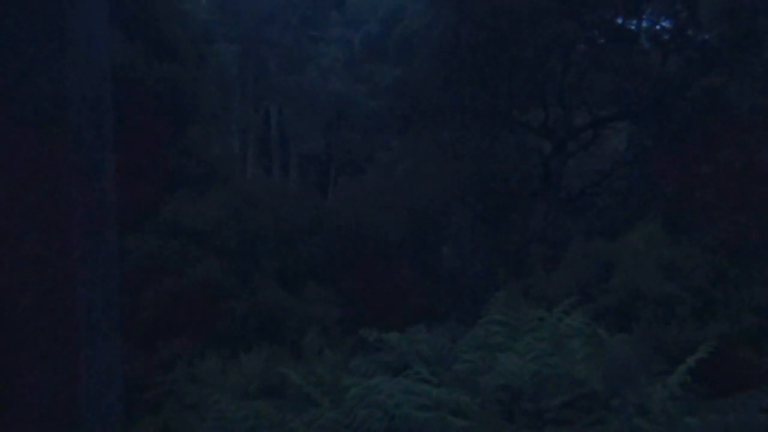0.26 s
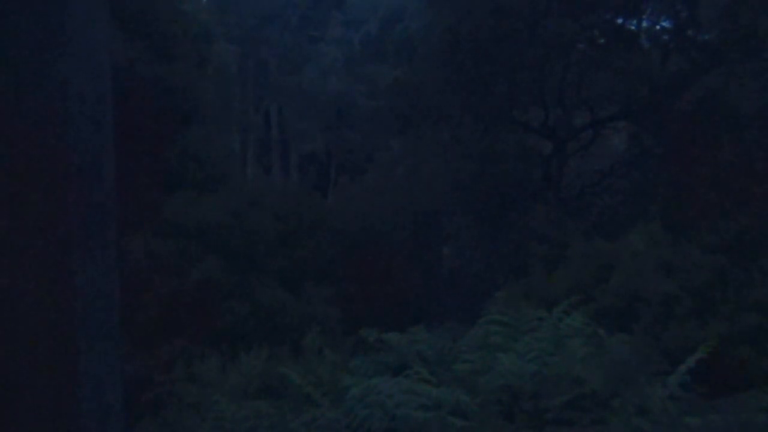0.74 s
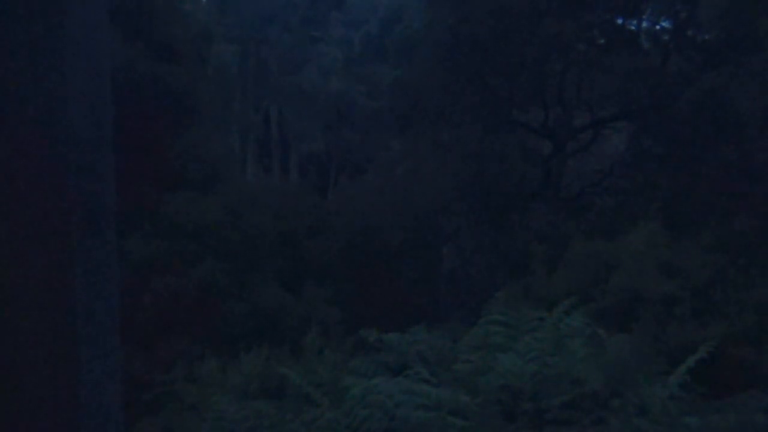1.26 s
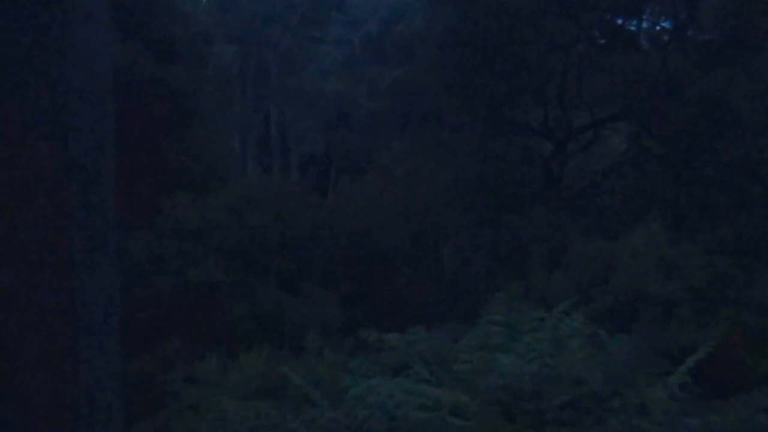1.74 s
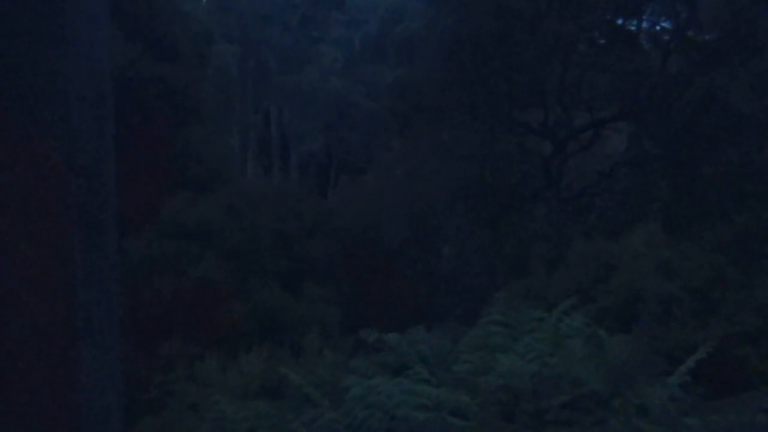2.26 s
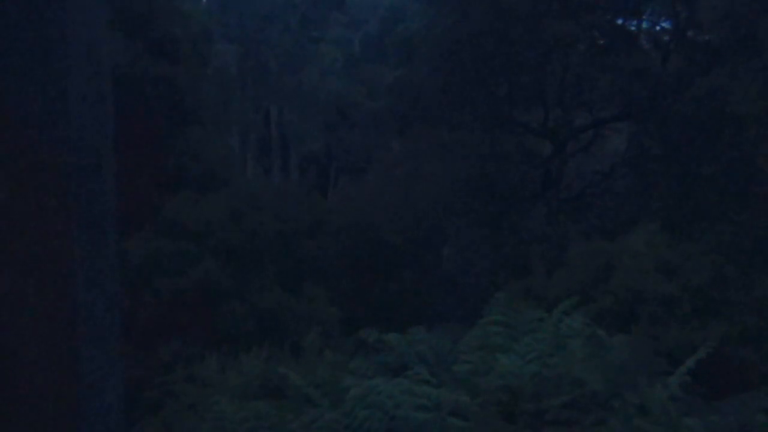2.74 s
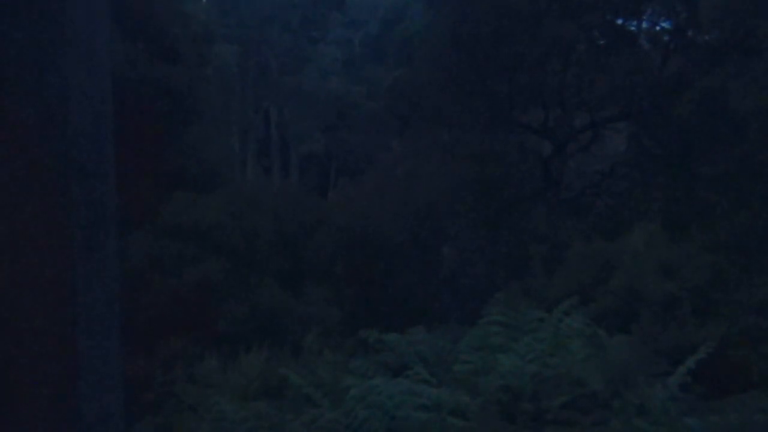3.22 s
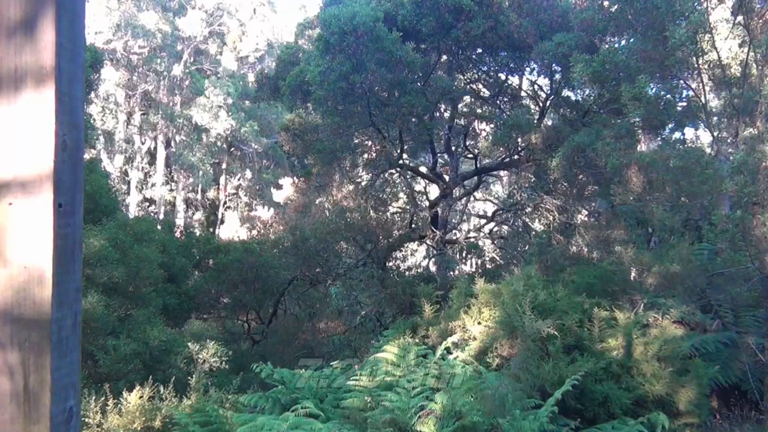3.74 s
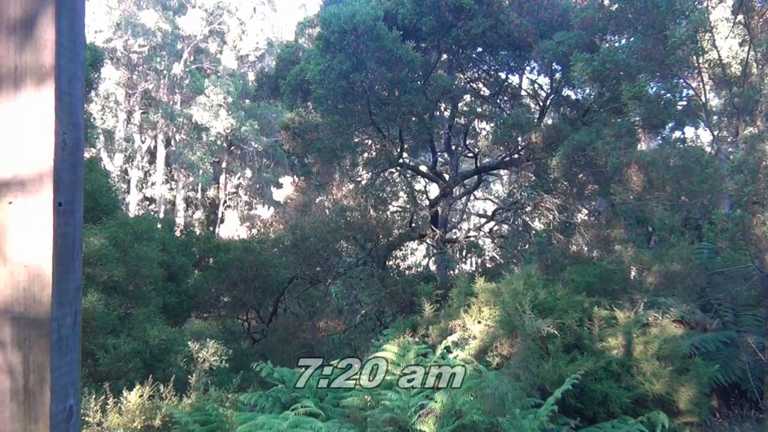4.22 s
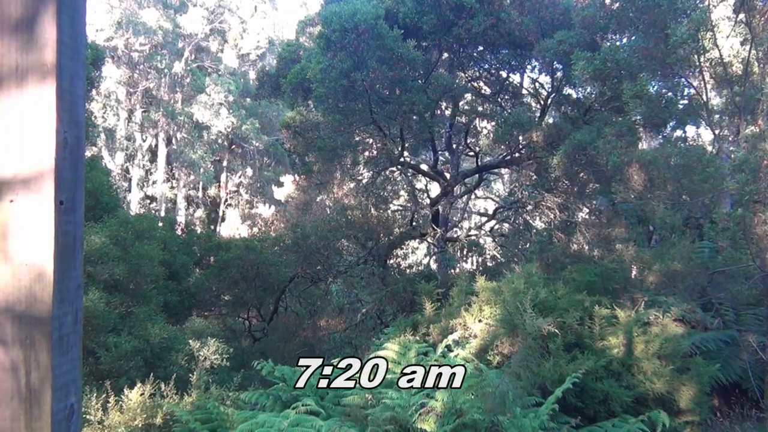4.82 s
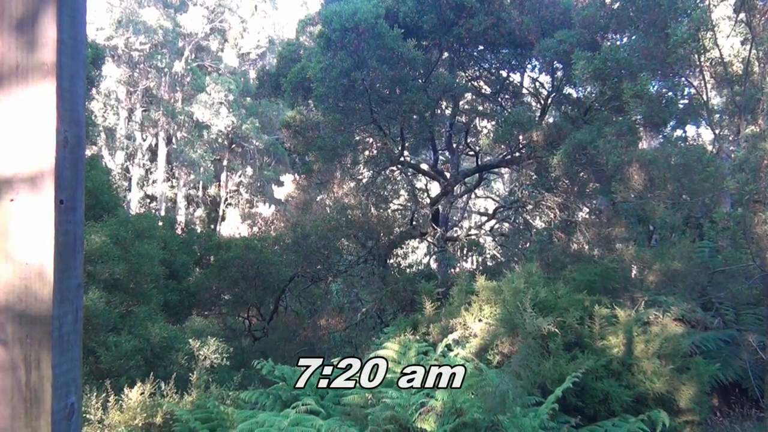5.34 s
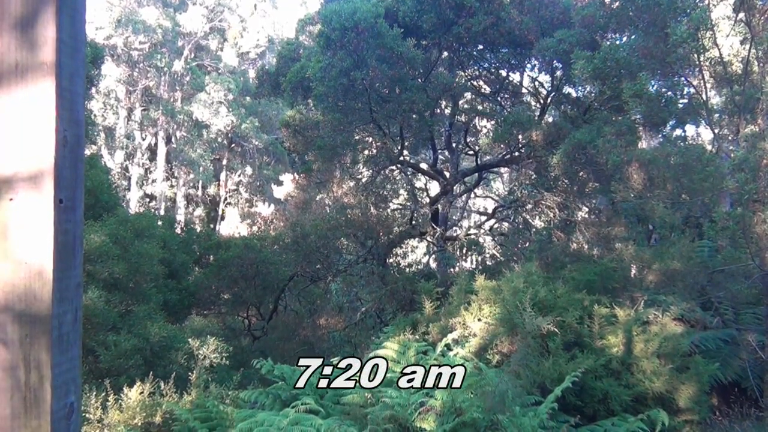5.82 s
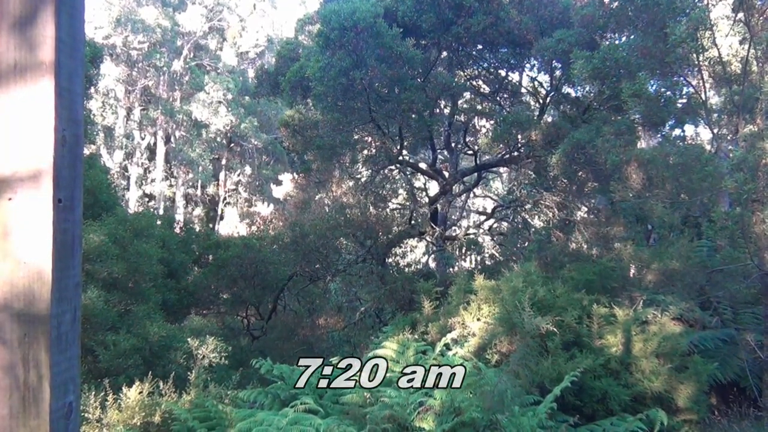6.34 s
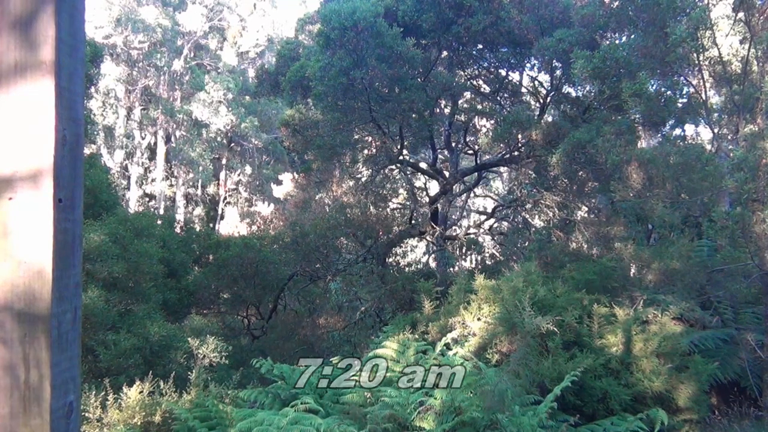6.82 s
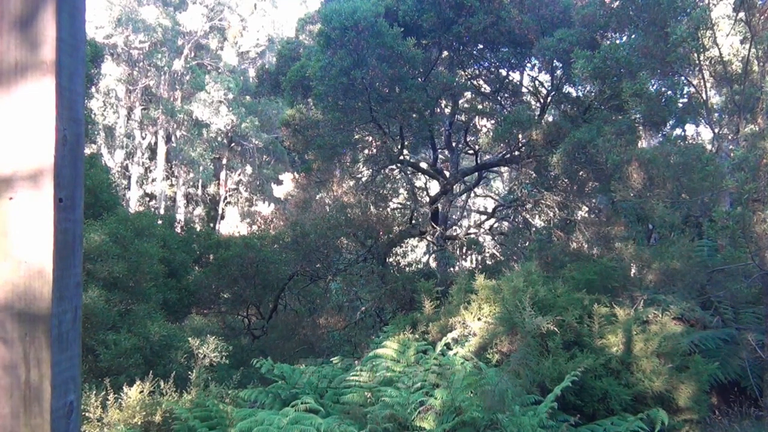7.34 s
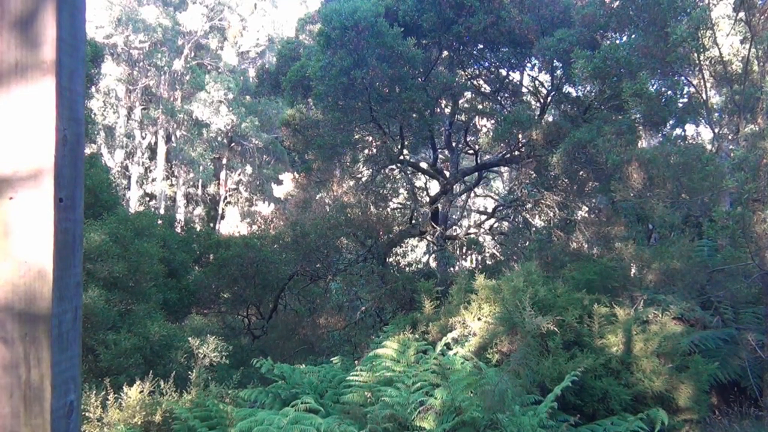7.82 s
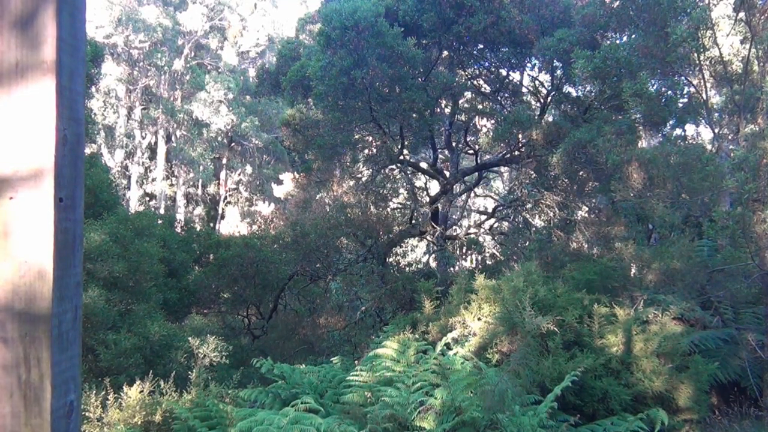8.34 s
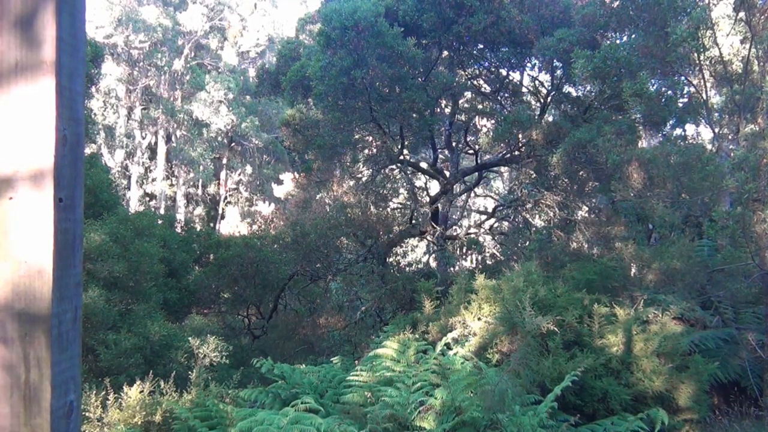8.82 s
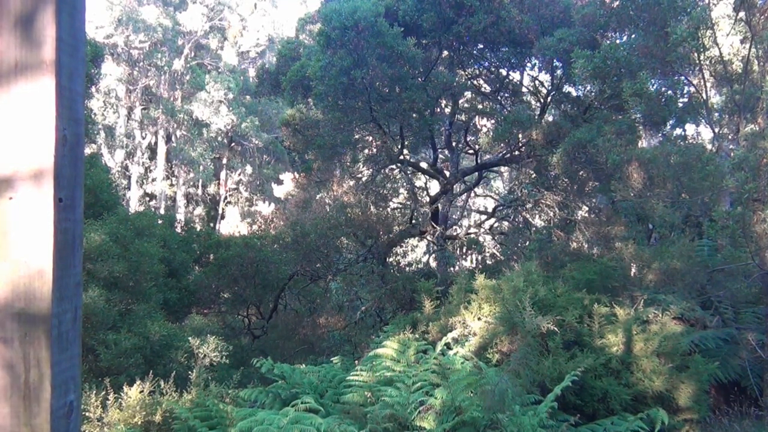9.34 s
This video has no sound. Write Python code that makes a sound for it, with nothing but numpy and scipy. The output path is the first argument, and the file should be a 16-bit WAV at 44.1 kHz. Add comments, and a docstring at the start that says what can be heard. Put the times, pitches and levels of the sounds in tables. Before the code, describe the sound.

Crowded chirping forest birds fade out after a few seconds; a quieter morning fades in with river wash, piping, whip-like calls and handling knocks.

```python
"""Forest around a distant river, heard by a small stereo camera microphone. Before dawn a dense chorus of bent
pure tones and insects of throbbing filtered noise play over a faint harmonic hum, then fade to silence. The morning
fades in over river noise: gliding whistles and whips, piped notes, harsh calls of resonated throat pulses and far
wavering calls. Knocks of scraping and thudding noise fall near the microphone throughout. Trunks and leaves
return every bird note as a diffuse echo."""
import sys
import numpy as np
from scipy import signal
from scipy.fft import rfft, irfft
from scipy.io import wavfile
from scipy.ndimage import uniform_filter1d

SR = 44100
rng = np.random.default_rng(int(sys.argv[2]) if len(sys.argv) > 2 else 0)


def master_out(mix):
    """Clip the mix to full scale and print it as 16-bit PCM to the path in sys.argv[1]."""
    frames = np.transpose(np.atleast_2d(mix))
    ceiling = np.clip(frames, -1, 1)
    pcm = np.round(ceiling * 32767).astype(np.int16)
    wavfile.write(sys.argv[1], SR, pcm)


N = 422037
TIME = np.arange(N) / SR
DAWN_FADE_S, SILENCE_S, MORNING_FULL_S = 2.37, 3.54, 4.43


def undb(db):
    """Decibels to gain."""
    return 10 ** (np.asarray(db) / 20)


def level(x, db):
    """Set the rms level."""
    return x * undb(db) / np.sqrt(np.mean(x ** 2))


def walk(rate, size=N):
    """Smooth random wander with spread near 1, from random steps at a rate in Hz."""
    k = max(int(SR / rate), 1)
    steps = np.repeat(rng.standard_normal(size // k + 1), k)
    return 1.3 * uniform_filter1d(uniform_filter1d(steps, k), k)[:size]


def band(x, hz, width_hz):
    """Two-pole resonance, gain 1 at the centre."""
    return signal.lfilter(*signal.iirpeak(hz, hz / width_hz, SR), x)


def add(out, sound, start, pan_db=0):
    """Place a sound between the channels; a positive pan leans left."""
    i = int(start * SR)
    out[:, i:i + len(sound)] += undb([[pan_db / 2], [-pan_db / 2]]) * sound[:N - i]


def glide(from_hz, to_hz, bend=0.502):
    """Three pitches of a glide; bend is the share of the interval covered at half length."""
    return from_hz, from_hz * (to_hz / from_hz) ** bend, to_hz


def whistle(length, pitch_hz, db, flutter_db=.8, waver_hz=0, edge=.2, top_db=-5):
    """A pure tone bent through three pitches, weaker above its middle pitch (dB per octave); leaves make it flutter."""
    u = np.linspace(0, 1, int(length * SR))
    first, mid, last = np.log(pitch_hz)
    slope, bow = last - first, first + last - 2 * mid
    hz = np.exp(mid + slope * (u - .5) + 2 * bow * (u - .5) ** 2) + waver_hz * walk(122.5, len(u))
    swell = np.sin(np.pi / 2 * np.clip(np.minimum(u, 1 - u) / edge, 0, 1))
    db = db + top_db * np.maximum(np.log2(hz / pitch_hz[1]), 0) + flutter_db * walk(40, len(u))
    return undb(db) * swell * np.sin(2 * np.pi * np.cumsum(hz) / SR)


def forest(dry, echo_db, t60_s, gap_s=0.007, side_db=-11):
    """Dense scattered echoes from trunks; the treble dies sooner."""
    t = np.arange(int(1.2 * SR)) / SR
    decay = np.exp(-np.log(1000) * t / t60_s) * (1 - np.exp(-t / gap_s))
    scatter = rng.standard_normal((2, len(t))) * decay
    late = signal.lfilter(*signal.butter(1, 3500, fs=SR), scatter)
    mid, side = late + (scatter - late) * np.exp(-t / .2)
    echoes = np.array([mid + undb(side_db) * side, mid - undb(side_db) * side])
    echoes = echoes * undb(echo_db) / np.sqrt(np.sum(mid ** 2))
    return dry + signal.fftconvolve(dry, echoes, axes=1)[:, :N]


# Stereo spread of the noise beds: (frequency [Hz], side over mid [dB])
BED_WIDTH = [(40, -10), (160, -22.5), (300, -18.5), (650, -9.5), (2000, -8), (7000, -5.5), (13000, -13)]


def bed(spectrum, db, flicker_db):
    """Stereo noise with a given spectrum; octave-wide parts flicker on their own."""
    hz = np.maximum(np.fft.rfftfreq(N, 1 / SR), 1)
    shape, width = (undb(np.interp(np.log(hz), np.log(f), gain))
                    for f, gain in (np.transpose(spectrum), np.transpose(BED_WIDTH)))
    mid, side = rfft(rng.standard_normal((2, N))) * shape
    pair = np.array([mid + width * side, mid - width * side])
    octaves = np.clip(np.log2(hz / 62.5), 0, 8)
    total = 0
    for k in range(9):
        part = irfft(pair * np.clip(1 - abs(octaves - k), 0, 1), N)
        total = total + part * undb(flicker_db * walk(6.8))
    return level(total, db)


# Tone colour of the blurred far chorus and air: (frequency [Hz], relative density [dB])
DAWN_SPECTRUM = [(59, -102), (100, -42), (200, -24.5), (278, -22), (1010, -13.5), (1480, -14.5),
                 (1980, -3.5), (3970, -8.5), (5000, -5.5), (5700, -11.5), (6600, -10.5), (7400, -15.5),
                 (8250, -25), (9080, -55), (10000, -50), (13000, -91), (22000, -120)]


def dawn_air():
    """Far chorus and air blurred into shaped, flickering noise."""
    return bed(DAWN_SPECTRUM, -37, 1.8)


# Tone colour of the river: (frequency [Hz], relative density [dB])
RIVER_SPECTRUM = [(18, -59), (30, -25), (111, -12.5), (193, 0.5), (549, -3), (1000, 2), (1240, -6.5),
                  (1410, -4.5), (2640, -7.5), (3810, -10.5), (6110, -17.5), (7730, -19), (15700, -23.5)]
# Slow level ride of the river: (time [s], gain [dB])
RIVER_RIDE = [(4.5, -0.5), (9.57, -3)]


def river():
    """A distant river as shaped noise whose level is ridden slowly."""
    return bed(RIVER_SPECTRUM, -45.5, 1.0) * undb(np.interp(TIME, *np.transpose(RIVER_RIDE)))


HUM_HZ, HUM_DB = 46.9, -66  # fundamental, level of each harmonic


def hum():
    """A faint steady hum under the dawn chorus, sounding only harmonics 6 to 8."""
    return undb(HUM_DB) * sum(np.sin(2 * np.pi * (k * HUM_HZ * TIME + rng.random())) for k in range(6, 9))


INSECT_HZ, INSECT_WIDTH_HZ, THROB_HZ, INSECT_DB = 13570, 2800, 15.86, -43.5


def insects():
    """Many insects stridulating in step: high hiss that throbs."""
    throb_db = 2.6 * np.cos(2 * np.pi * (THROB_HZ * TIME + .02 + .05 * walk(5)))
    mid, side = (band(band(rng.standard_normal(N), INSECT_HZ, INSECT_WIDTH_HZ), INSECT_HZ, INSECT_WIDTH_HZ)
                 for _ in range(2))
    hiss = mid + undb(-17.0) * side * np.array([[1], [-1]])
    return level(hiss * undb(throb_db + 0.61 * walk(20)), INSECT_DB)


def crowd(count=750, loudest_db=-33.5):
    """Further birds before dawn, at random: mostly quick falling chips, some rising, hooked or arched."""
    out = np.zeros((2, N))
    for when, low, fall, bow, long, loud, side in rng.random((count, 7)):
        end_hz = 1900 + 2400 * low ** .7
        drop = .36 * fall - .1  # a negative drop makes the note rise
        pitch = end_hz * np.array([1 + drop, 1 + .25 * drop + .16 * (bow - .5), 1])
        note = whistle(.014 + 0.035 * long, pitch, loudest_db - 10 * loud, 2.5)
        add(out, note, when * SILENCE_S, 6 * (side - .4))
    return out


# Knocks near the microphone: (start [s], scrape level [dB], thud over scrape [dB], decay time [s])
KNOCK_HITS = [(0.103, -51, 8, 0.032), (0.626, -41.5, -3, 0.043), (0.99, -39, -1.5, 0.037),
              (1.562, -51.5, 11.5, 0.049), (2.418, -52, 8, 0.036), (3.276, -28.5, -7, 0.029),
              (3.35, -30.5, -4, 0.026), (4.01, -36.5, 4, 0.0081), (4.571, -29, -4, 0.034),
              (4.848, -39, 9.5, 0.019), (6.858, -38.5, -10, 0.13), (9.175, -27.5, -9, 0.02),
              (9.189, -22, -21, 0.0026), (9.199, -21, -23, 0.0026), (9.202, -32.5, 2, 0.024)]


def knocks():
    """A bright scrape and a dull thud of the housing, both resonated noise, dying together."""
    out = np.zeros((2, N))
    for start, db, thud_db, length in KNOCK_HITS:
        t = np.arange(int(4 * length * SR)) / SR
        scrape, thud = rng.standard_normal((2, len(t)))
        scrape = level(band(scrape, 1800, 2200), db)
        thud = level(band(band(thud, 340, 620), 340, 620), db + thud_db)
        envelope = np.exp(-t / length) * (1 - np.exp(-t / (0.83 * length)))
        add(out, (scrape + thud) * envelope, start)
    return out


# Far wavering calls: (start [s], length [s], start pitch [Hz], end pitch [Hz], level [dB], waver [Hz])
FAR_CALLS = [(0.187, 0.11, 6560, 6400, -43.5, 140), (0.412, 0.1, 6920, 7000, -50, 55),
             (.57, 0.074, 6200, 6450, -48, 69), (1.436, 0.038, 7060, 7020, -31.5, 195),
             (3.556, 0.082, 1031, 1033, -40.5, 9.1), (3.576, 0.19, 2845, 2740, -44.5, 184),
             (3.718, 0.048, 2886, 3230, -41, 68), (3.756, 0.15, 1057, 1027, -48, 10.7),
             (3.82, 0.16, 1153, 1143, -43, 8.3), (4.001, 0.85, 1130, 1113, -52, 14.2),
             (4.422, 0.11, 1076, 1028, -42, 5.6), (4.423, 0.39, 1398, 1385, -54, 10),
             (4.516, 0.31, 1030, 1017, -44.5, 26.5), (4.676, 0.46, 1123, 1120, -47.5, 4.2),
             (5.151, 0.39, 1101, 1028, -40.5, 1.9), (5.555, 0.24, 990, 834, -50, 59),
             (6.2, 0.051, 1500, 1446, -52.5, 9.9), (6.301, 0.016, 986, 1050, -46, 32),
             (6.678, 0.23, 903, 927, -51.5, 59), (7.066, 0.036, 7400, 7130, -50, 130),
             (8.376, 0.16, 1827, 1880, -53, 47), (8.68, .09, 5600, 5400, -61, 90),
             (8.898, 0.063, 1836, 1800, -51, 41), (9.332, 0.09, 3320, 3760, -55, 154)]


def far_calls(out):
    """Far tones with unsteady pitch; the more they waver, the more they flutter, up to a limit."""
    for start, length, from_hz, to_hz, db, waver_hz in FAR_CALLS:
        flutter_db = min(1 + waver_hz / 10, 3.8)
        add(out, whistle(length, glide(from_hz, to_hz), db, flutter_db, waver_hz), start, 2.5)


# Thin double ticks of one small bird: (start [s], level [dB])
TICK_PAIRS = [(0.635, -39.5), (.808, -44), (.971, -39), (1.132, -42.5), (2.108, -41)]


def ticks(out):
    """Two tiny rising tones in quick succession, the second lower."""
    for start, db in TICK_PAIRS:
        add(out, whistle(0.019, (7200, 7900, 8600), db), start)
        add(out, whistle(0.012, (6000, 6900, 7400), db + 1.0), start + 0.012)


# Scooped calls: (start [s], level [dB])
SCOOP_CALLS = [(3.795, -48.5), (6.664, -49.5), (8.499, -54)]


def scoops(out, lead_s=.065, flip_s=.035, pan_db=5):
    """A slow lead-in that flips upward."""
    for start, db in SCOOP_CALLS:
        add(out, whistle(lead_s, glide(4980, 5350), db), start, pan_db)
        add(out, whistle(flip_s, glide(5350, 6250), db), start + .9 * lead_s, pan_db)


# Steep low drops of one bird to the right: (start [s], start pitch [Hz], end pitch [Hz], level [dB])
LOW_DROPS = [(.995, 3270, 1614, -29.5), (1.133, 2900, 1686, -27), (1.288, 2940, 1970, -27),
             (2.292, 3090, 1867, -30), (2.468, 2890, 1880, -28.5)]


def drops(out):
    """Short tones that plunge, faster in the second half."""
    for start, from_hz, to_hz, db in LOW_DROPS:
        add(out, whistle(.036, glide(from_hz, to_hz, .42), db), start, -3.5)


# Short squeaks of the harsh callers: (start [s], length [s], start pitch [Hz], end pitch [Hz], level [dB])
SQUEAK_NOTES = [(8.21, .024, 4400, 4300, -50), (8.226, .018, 4400, 3900, -49),
                (8.234, .022, 3400, 2750, -41), (8.918, .014, 4400, 4050, -53),
                (8.938, .045, 3150, 2750, -44), (9.245, .035, 3450, 2950, -50),
                (9.495, .045, 3200, 2450, -47)]


def squeaks(out):
    """Brief falling tones with unsteady pitch."""
    for start, length, from_hz, to_hz, db in SQUEAK_NOTES:
        add(out, whistle(length, glide(from_hz, to_hz, .65), db, 2.5, 90), start, 1.5)


# Harsh calls: (start [s], length [s], start pulse rate [Hz], end pulse rate [Hz], level [dB],
# roughness [0 = clear], brightness [dB per octave])
HARSH_NOTES = [(4.292, 0.11, 530, 560, -48.5, 0.3, -4), (4.99, 0.12, 455, 562, -45, 0.3, 1),
               (8.245, 0.1, 800, 640, -44.5, 0.95, 4), (8.501, 0.085, 580, 545, -45, 0.7, -7),
               (8.951, 0.11, 820, 660, -39.5, 0.95, 1), (9.422, 0.1, 548, 545, -45, 0.5, -6)]
# Throat resonances, each passed twice: (centre [Hz], width of one pass [Hz], gain before brightness [dB])
THROAT_RESONANCES = [(1500, 800, 0), (2150, 750, -6), (2900, 1100, -5), (4400, 1500, -16),
                     (5600, 1500, -25)]


def harsh_calls():
    """Throat pulses through fixed resonances; the pulse rate glides and the end breaks into noise."""
    out = np.zeros((2, N))
    for start, length, from_hz, to_hz, db, rough, bright_db in HARSH_NOTES:
        u = np.linspace(0, 1, int(length * SR))
        hz = to_hz + (from_hz - to_hz) * (1 - u) ** 1.3
        hoarse = rough * (.65 + 1.8 * u ** 3)
        cycles = np.cumsum(hz * (1 + .11 * hoarse * walk(250, len(u)))) / SR
        beats = np.diff(np.floor(cycles), prepend=0)  # one click per throat cycle
        pulses = level(beats, 0) + hoarse * rng.standard_normal(len(u))
        voice = 0
        for f, width, gain_db in THROAT_RESONANCES:
            tilt_db = bright_db * np.log2(f / THROAT_RESONANCES[0][0])
            voice = voice + undb(gain_db + tilt_db) * band(band(pulses, f, width), f, width)
        envelope = signal.windows.tukey(len(u), .3) * undb(1.3 * walk(108.5, len(u)))
        add(out, level(voice, db) * envelope, start, 1.5)
    squeaks(out)
    return out


# Long swelling piped notes, one curve each: (time [s], pitch [Hz], level [dB])
PIPED_CURVES = [
    [(4.38, 2727, -36), (4.43, 2876, -53), (4.59, 2767, -32.5), (4.66, 2718, -35.5), (4.68, 2780, -45.5),
     (4.914, 2773, -48), (4.95, 2670, -53)],
    [(6.12, 2630, -58), (6.128, 2704, -46.5), (6.212, 2797, -37.5), (6.316, 2788, -31.5),
     (6.428, 2665, -34), (6.44, 2680, -42), (6.45, 2810, -44)],
]


def pipers():
    """The long notes of one clear bird: a tone with a weak octave, drawn along pitch and level curves."""
    out = np.zeros((2, N))
    for curve in PIPED_CURVES:
        s, hz, db = np.transpose(curve)
        t = np.arange(s[0], s[-1], 1 / SR)
        phase = 2 * np.pi * np.cumsum(np.interp(t, s, hz)) / SR
        tone = np.sin(phase) + undb(-16) * np.sin(2 * phase)
        add(out, tone * undb(np.interp(t, s, db)) * signal.windows.tukey(len(t), .1), s[0], -1)
    return out


# Whips and arched calls: (start [s], length [s], start pitch [Hz], end pitch [Hz], level [dB],
# left minus right [dB], share of the glide done at half length [ratio])
WHIP_CALLS = [(1.428, 0.061, 1930, 1790, -26, 1.5, -0.6), (2.561, 0.054, 3096, 2800, -28.5, 1, 0.095),
              (2.636, 0.063, 3250, 2970, -28, 4.5, 0.12), (2.659, 0.11, 1884, 1520, -39, -2, .35),
              (1.985, 0.012, 6430, 9000, -31.5, 0, 0.43), (2.225, 0.023, 6730, 8550, -32, 0, 0.74),
              (3.919, 0.027, 1776, 2774, -40.5, 3, 0.86), (4.135, 0.032, 3190, 4140, -54, 7, 0.57),
              (4.254, 0.075, 2950, 4130, -41.5, 3.5, 0.75), (4.308, 0.053, 3950, 6470, -41, 4, 0.37),
              (4.511, 0.029, 1930, 4850, -41, 5, 0.58), (6.564, 0.053, 2200, 2810, -47, 5, 0.19),
              (6.693, 0.066, 3030, 4920, -37.5, 3.5, 0.88), (6.84, 0.1, 2400, 4190, -36.5, 3, 0.7),
              (7.156, 0.05, 1850, 2250, -46.5, 1, .05), (7.192, 0.087, 2000, 6850, -34.5, 3, 0.64)]


def whips(out):
    """Fast bent glides that flutter and lose level strongly above their middle pitch."""
    for start, length, from_hz, to_hz, db, pan_db, bend in WHIP_CALLS:
        add(out, whistle(length, glide(from_hz, to_hz, bend), db, 2.1, top_db=-21.5), start, pan_db)


# Held or evenly gliding whistles: (start [s], length [s], start pitch [Hz], end pitch [Hz], level [dB],
# left minus right [dB])
WHISTLE_NOTES = [(.101, 0.079, 6190, 6640, -38, -8), (.232, 0.18, 1666, 1681, -30.5, -1.5),
                 (.23, 0.025, 4140, 4380, -21.5, 0), (.333, 0.16, 3829, 3762, -21.5, 0),
                 (.442, 0.12, 1815, 1763, -29, 0), (.56, 0.072, 1786, 2070, -32.5, 1.5),
                 (.631, 0.053, 3650, 3900, -21, -1), (.695, 0.21, 2540, 1910, -28, 2),
                 (.9, 0.092, 1930, 1640, -42, -1), (.799, 0.063, 6590, 6500, -43.5, 0),
                 (.83, 0.12, 3800, 3800, -33, -4), (.885, 0.15, 1504, 1597, -41.5, 1),
                 (1.01, 0.14, 1590, 1413, -46.5, 1), (1.232, 0.03, 4050, 4107, -22, 2),
                 (1.255, 0.14, 1580, 1890, -33, 2), (1.327, 0.08, 4000, 3960, -27, -1),
                 (1.4, 0.089, 3790, 3500, -31, -4), (1.92, 0.26, 2150, 2010, -33.5, -2),
                 (2.03, 0.032, 4610, 4500, -22.5, 3.5), (2.114, 0.095, 4034, 4110, -26.5, -3),
                 (2.258, 0.044, 8400, 8340, -37.5, -1), (2.372, 0.072, 7260, 7730, -40.5, 0),
                 (2.496, 0.14, 7200, 7900, -41.5, 2.5), (2.59, 0.11, 4210, 3790, -23.5, 2),
                 (2.61, 0.16, 8340, 7800, -38.5, 2.5), (2.685, 0.035, 2810, 2310, -31, 3),
                 (2.435, 0.033, 3480, 3770, -34.5, 0), (3.004, 0.13, 1925, 1655, -39.5, 0),
                 (3.11, 0.027, 2740, 3300, -31, 0), (3.455, 0.055, 4000, 1900, -28, 1),
                 (3.16, 0.027, 3870, 3830, -24.5, 2.5), (3.25, 0.093, 5300, 5130, -35.5, -1.5),
                 (3.36, 0.052, 2100, 2110, -40, -7.5), (5.61, 0.12, 7800, 8000, -55.5, 3),
                 (6.505, 0.018, 2710, 2760, -48, -2)]


def whistles(out):
    """Pure tones held or gliding evenly."""
    for start, length, from_hz, to_hz, db, pan_db in WHISTLE_NOTES:
        add(out, whistle(length, glide(from_hz, to_hz, .5), db), start, pan_db)


# Falling chips: (start [s], length [s], start pitch [Hz], end pitch [Hz], level [dB], left minus right [dB])
CHIP_NOTES = [(0, 0.047, 4170, 3780, -22, 3), (.162, .031, 5330, 3670, -28, 1),
              (.2, 0.028, 4800, 3930, -23.5, 2), (.33, 0.017, 4280, 3760, -28, 7),
              (.375, 0.016, 4480, 3900, -28, 0), (.405, 0.034, 4700, 3860, -23, 0),
              (.435, 0.02, 4700, 3850, -23, -4), (.55, 0.055, 5420, 4000, -28, 2),
              (.6, 0.02, 4780, 3950, -21.5, 1), (.748, 0.059, 5050, 3600, -27, 3),
              (.804, 0.034, 4810, 3400, -26.5, 2), (.832, 0.024, 4480, 3680, -22.5, 1),
              (.998, 0.022, 4680, 4220, -24.5, 0), (1.032, 0.044, 5150, 3140, -26.5, 4),
              (1.08, 0.042, 4540, 3890, -24.5, -3), (1.172, 0.027, 4420, 3810, -27, 4),
              (1.205, .035, 4550, 4050, -27, 5), (1.27, 0.052, 4450, 4034, -22.5, 2),
              (1.329, 0.048, 4120, 3320, -31, -2.5), (1.466, 0.022, 4910, 3930, -26, 5),
              (1.498, 0.018, 4990, 3880, -25, -2), (1.503, 0.063, 3965, 3514, -26.5, 0),
              (1.623, 0.021, 4840, 4420, -28, -2.5), (1.704, 0.017, 4640, 3740, -23, -4.5),
              (1.742, 0.065, 4260, 3860, -24, 3), (1.779, 0.06, 4010, 3710, -25, -3),
              (1.98, 0.058, 4900, 4080, -28, 3), (2.1, 0.027, 4800, 3903, -28, -1),
              (2.12, 0.028, 2790, 1896, -28, 0), (2.151, 0.017, 4420, 3980, -19, 0.5),
              (2.217, 0.023, 8820, 7040, -34, -3.5), (2.2, 0.049, 4300, 3700, -26.5, 2),
              (2.252, 0.041, 3180, 2710, -35, -1), (2.305, .045, 3450, 2830, -31, 0),
              (2.355, 0.048, 2385, 1940, -41, 0), (2.275, 0.17, 1970, 1534, -40.5, -0.5),
              (2.356, 0.017, 8340, 6130, -33, -3), (2.362, 0.03, 4720, 3220, -30, -1),
              (2.415, 0.03, 4320, 3540, -27, 2.5), (2.49, .011, 8660, 7270, -33.5, -2.5),
              (2.538, 0.036, 5000, 3870, -26, 2), (2.582, 0.015, 4530, 3950, -21.5, 3.5),
              (2.84, 0.0227, 4230, 3750, -22, -0.5), (3.008, 0.065, 5580, 4580, -31, 2),
              (3.067, 0.036, 4710, 4030, -21, 2.5), (3.11, 0.037, 4400, 3990, -24, 2),
              (3.088, 0.032, 3270, 2680, -31, 13.5), (3.3, 0.046, 4440, 3990, -22, 1),
              (3.34, 0.036, 4000, 3500, -27, 3.5), (3.4, 0.03, 4300, 3860, -21.5, 2),
              (4.037, 0.095, 7530, 7030, -53.5, -2.5), (6.985, 0.059, 2524, 1670, -44.5, 4)]


def chips(out):
    """Short falling tones, fast at first."""
    for start, length, from_hz, to_hz, db, pan_db in CHIP_NOTES:
        add(out, whistle(length, glide(from_hz, to_hz, .68), db), start, pan_db)


# Loud rising chirps of one near bird: (start [s], start pitch [Hz], level [dB])
CHIRP_NOTES = [(1.644, 5660, -16.5), (2.121, 5706, -14.5), (2.578, 5750, -12), (3.02, 5810, -14.5),
               (3.416, 6360, -19.5)]


def chirps(out):
    """Rounded tones rising fast at first, wavering, with the level falling steeply as they climb past the middle."""
    for start, hz, db in CHIRP_NOTES:
        note = whistle(.055, glide(hz, 1.18 * hz, .68), db, flutter_db=3.8, waver_hz=60, edge=.5, top_db=-30)
        add(out, note, start, 3)


def singers():
    """The whistling birds that can be told apart, each note a bent pure tone."""
    out = np.zeros((2, N))
    for sing in (far_calls, ticks, scoops, drops, whips, whistles, chips, chirps):
        sing(out)
    return out


def scene():
    """Dawn fades to silence, morning fades in; the knocks follow the same fade."""
    early = TIME < SILENCE_S
    birds = singers()
    chorus = forest((birds + crowd()) * early, -3.1, 0.65)
    dawn = dawn_air() + hum() + insects() + chorus
    harsh = forest(harsh_calls(), -4.0, 0.59)  # the harsh callers sit nearer
    morning = river() + harsh + forest(pipers(), -6.5, 1.95) + forest(birds * ~early, 1.0, 1.0)
    fade = np.interp(TIME, (DAWN_FADE_S, SILENCE_S, MORNING_FULL_S), [1, 0, 1])
    return fade * (np.where(early, dawn, morning) + knocks())


def record(dry):
    """The camera favours the left a little and cuts the top above 15.8 kHz."""
    top_cut = signal.ellip(10, .2, 75, 15800, fs=SR, output="sos")
    return signal.sosfilt(top_cut, dry * undb([[.2], [-.2]]))


dry = scene()
out = record(dry)
master_out(out)
```